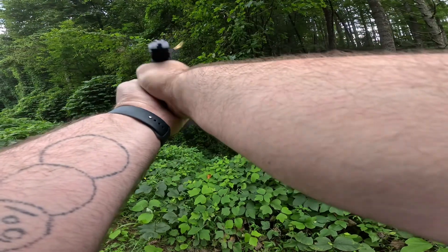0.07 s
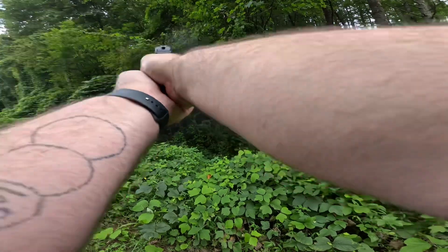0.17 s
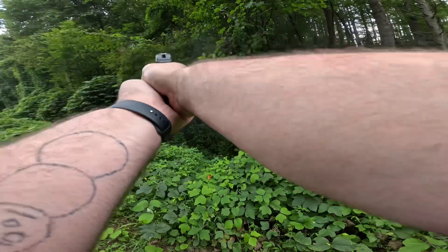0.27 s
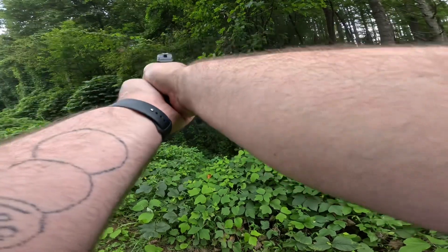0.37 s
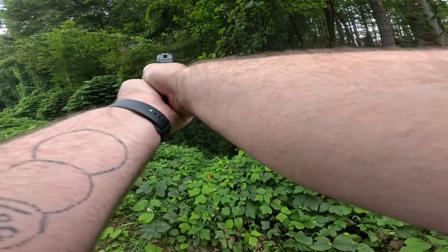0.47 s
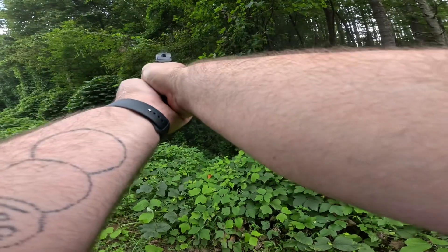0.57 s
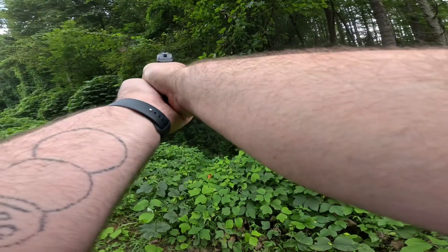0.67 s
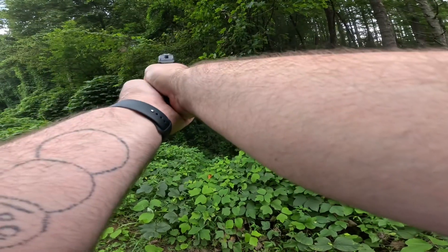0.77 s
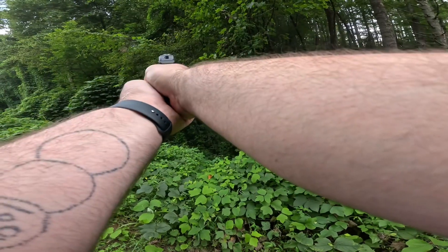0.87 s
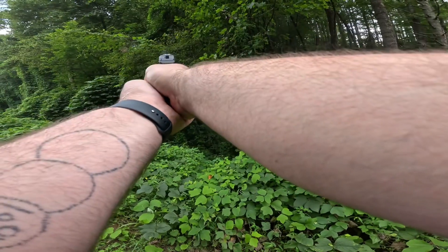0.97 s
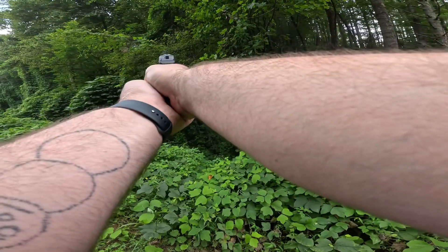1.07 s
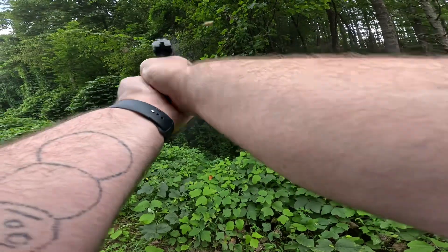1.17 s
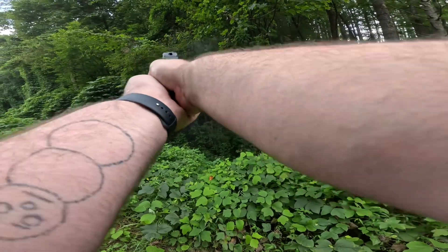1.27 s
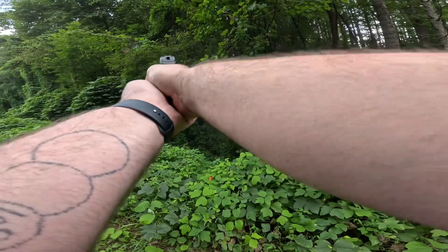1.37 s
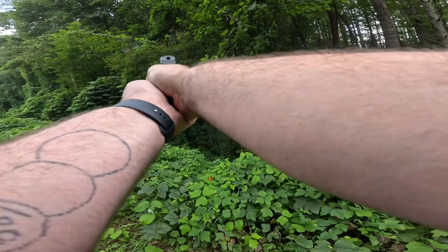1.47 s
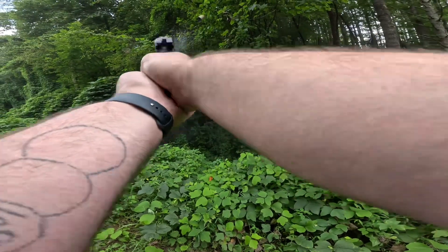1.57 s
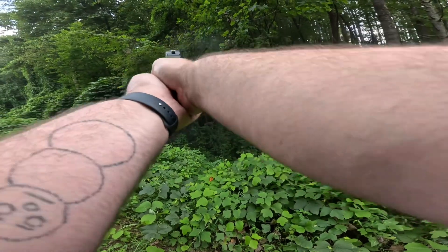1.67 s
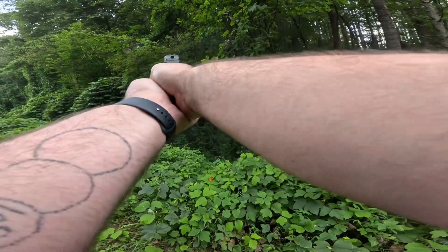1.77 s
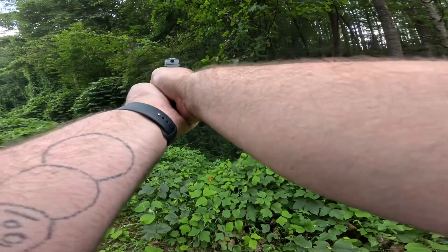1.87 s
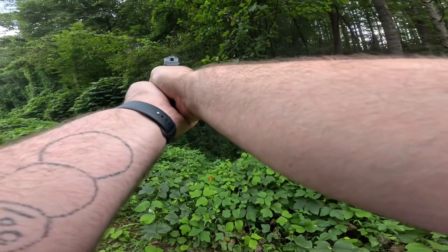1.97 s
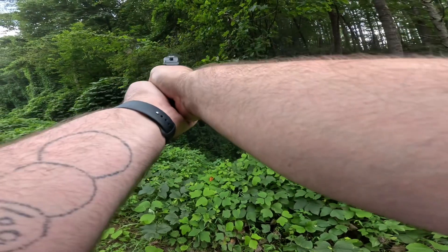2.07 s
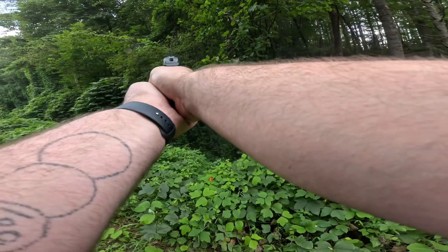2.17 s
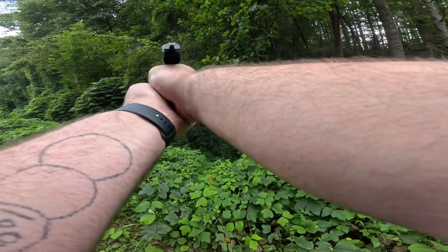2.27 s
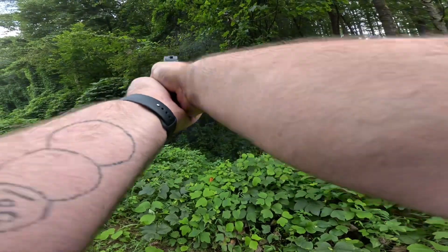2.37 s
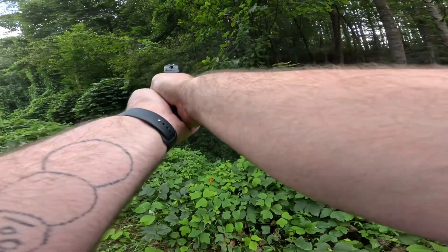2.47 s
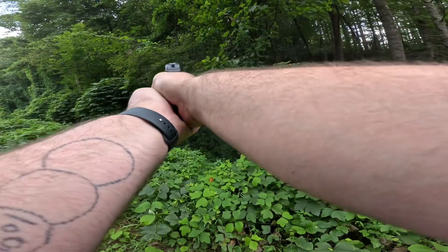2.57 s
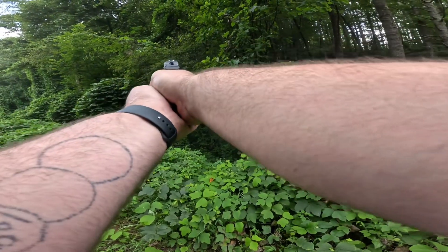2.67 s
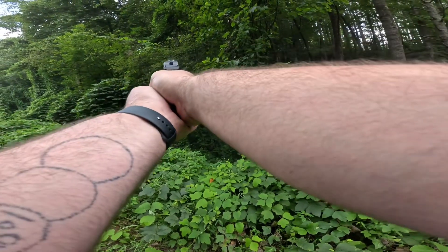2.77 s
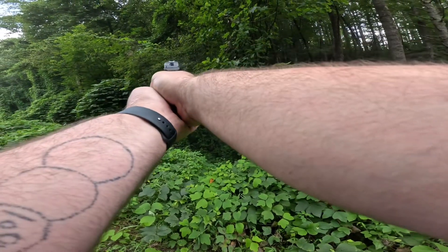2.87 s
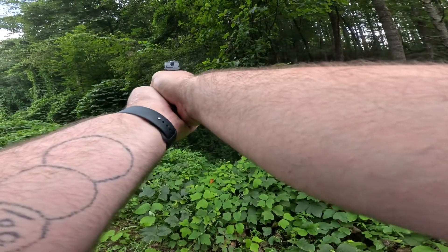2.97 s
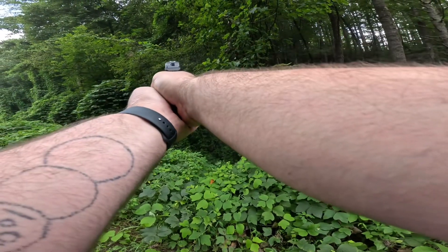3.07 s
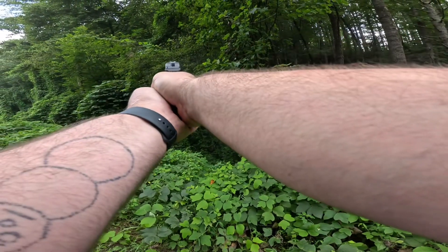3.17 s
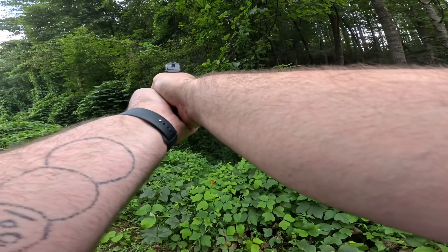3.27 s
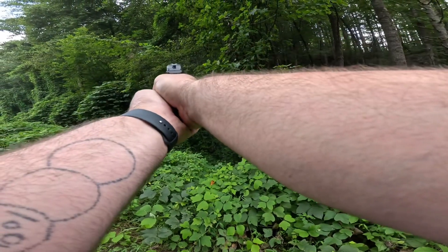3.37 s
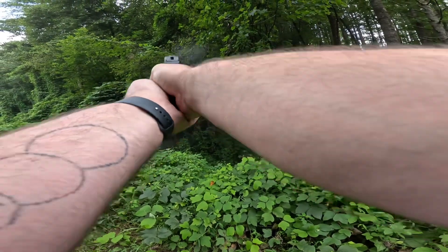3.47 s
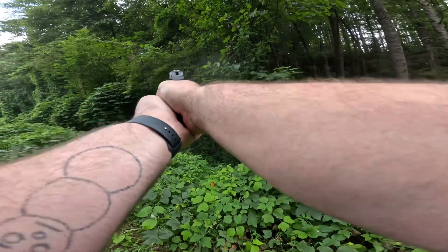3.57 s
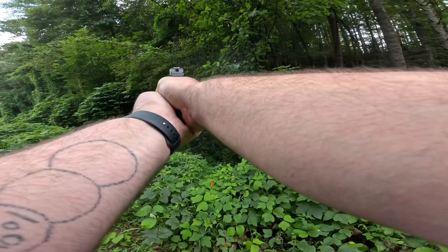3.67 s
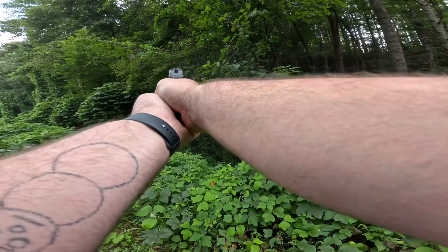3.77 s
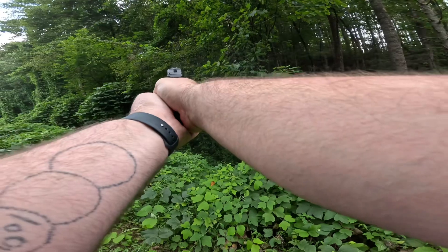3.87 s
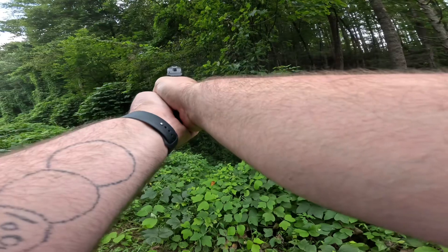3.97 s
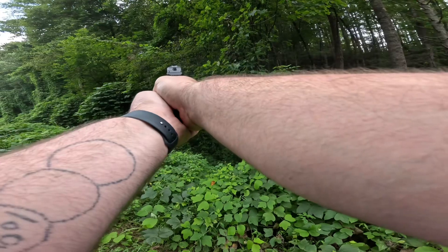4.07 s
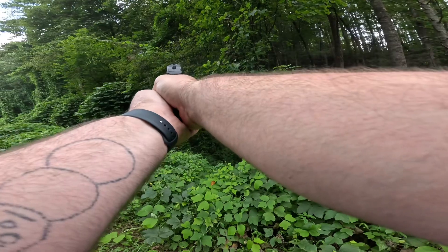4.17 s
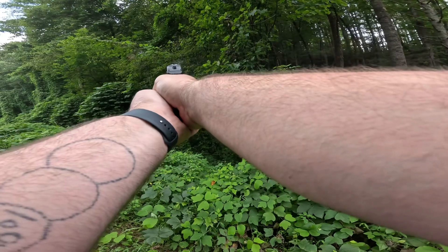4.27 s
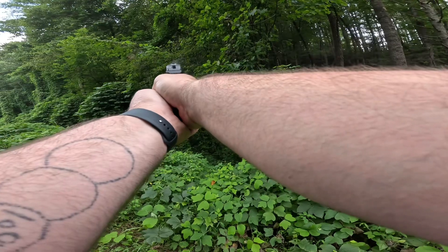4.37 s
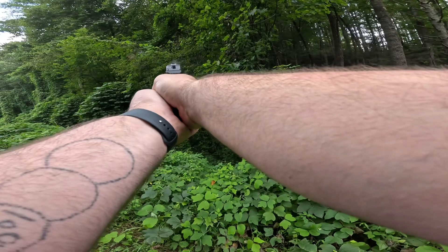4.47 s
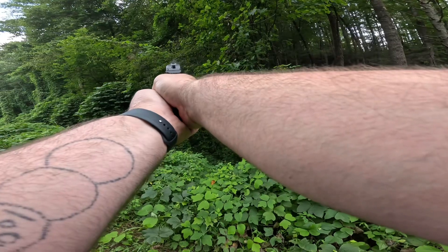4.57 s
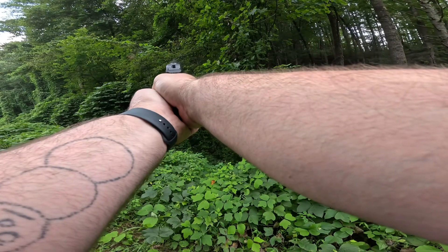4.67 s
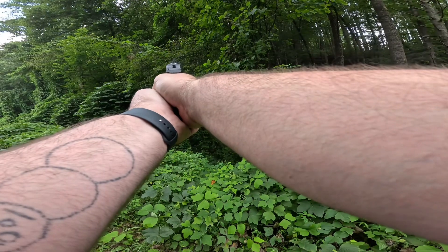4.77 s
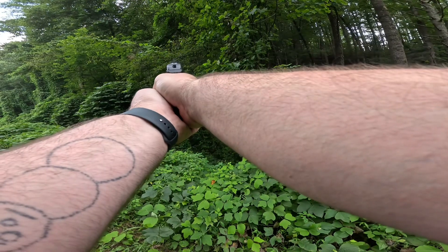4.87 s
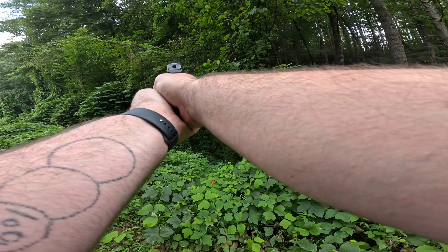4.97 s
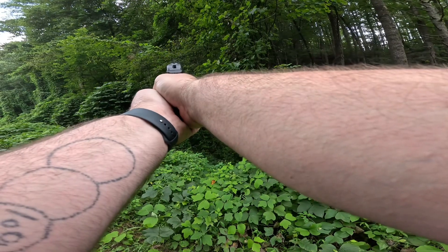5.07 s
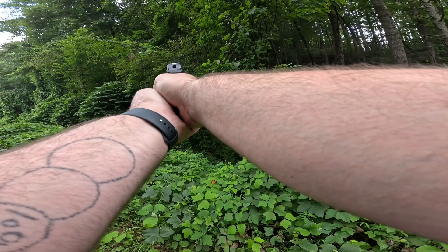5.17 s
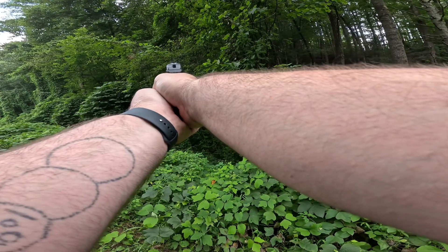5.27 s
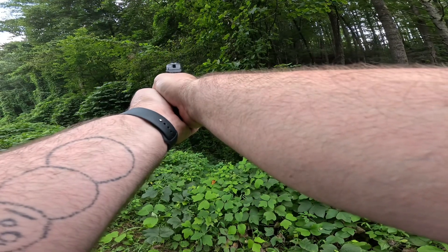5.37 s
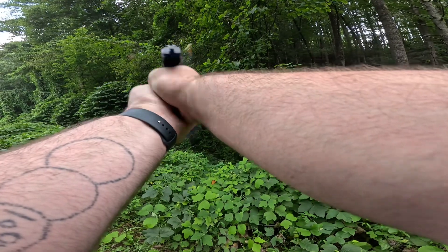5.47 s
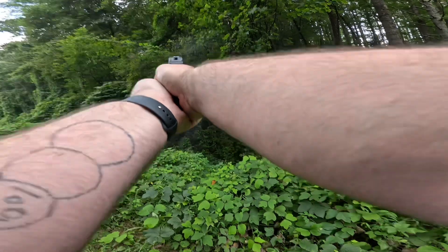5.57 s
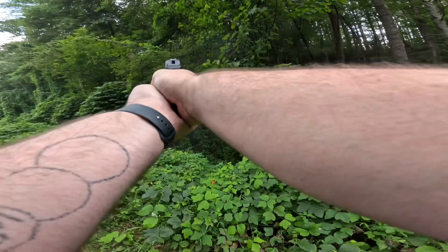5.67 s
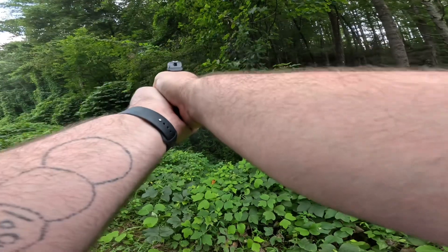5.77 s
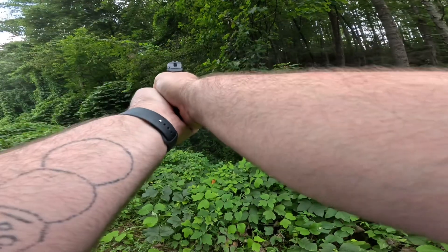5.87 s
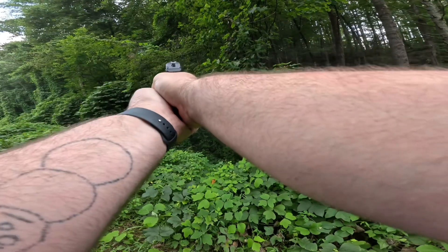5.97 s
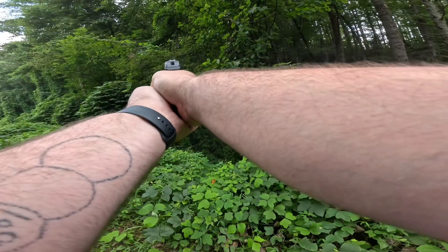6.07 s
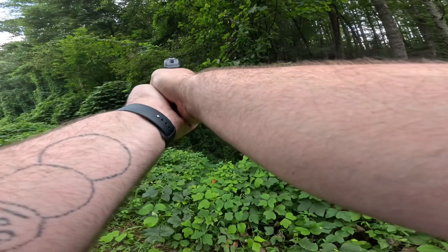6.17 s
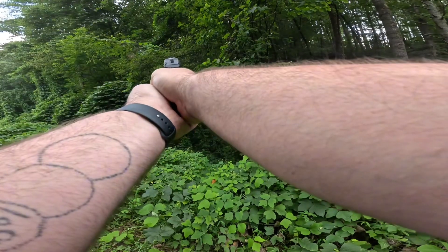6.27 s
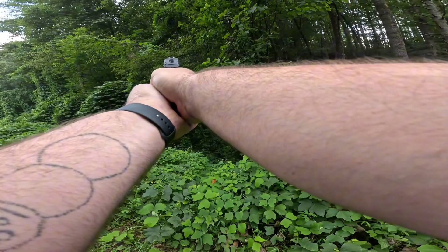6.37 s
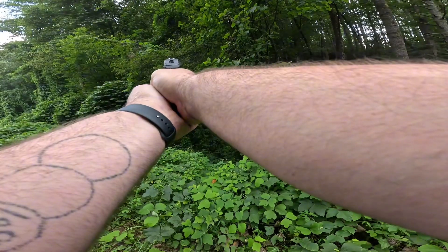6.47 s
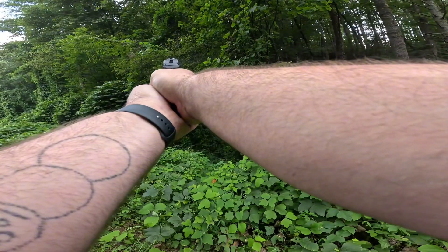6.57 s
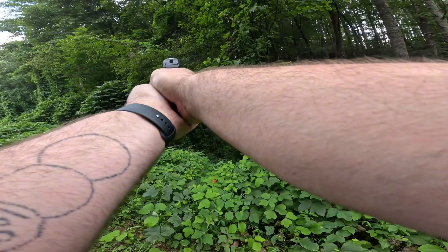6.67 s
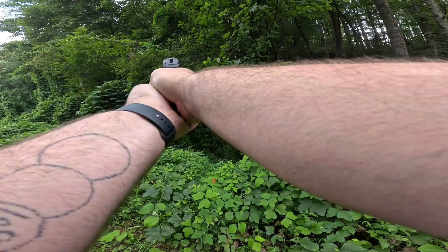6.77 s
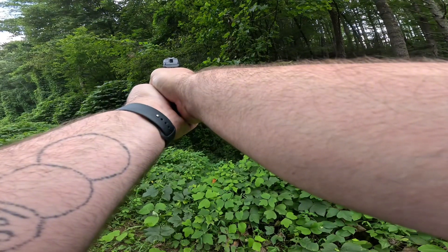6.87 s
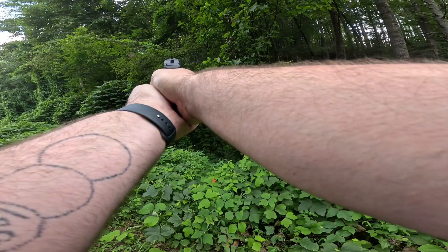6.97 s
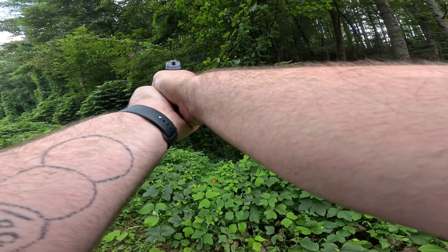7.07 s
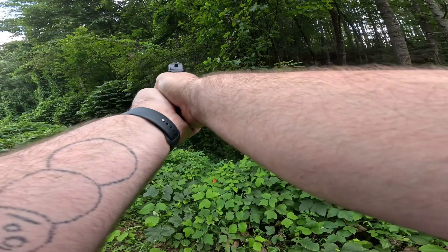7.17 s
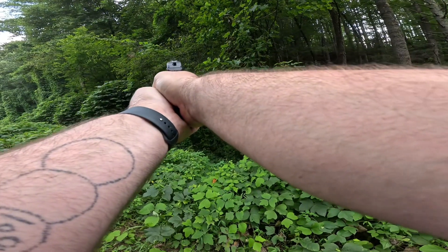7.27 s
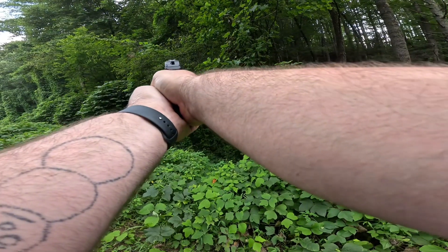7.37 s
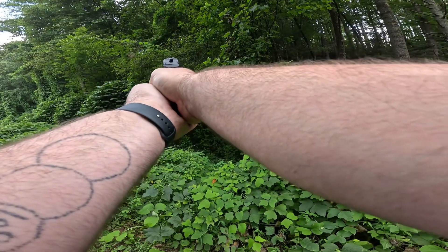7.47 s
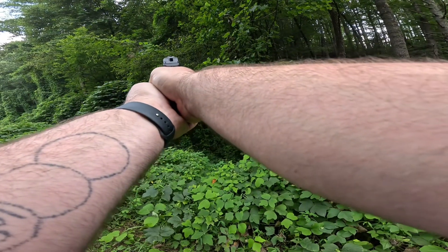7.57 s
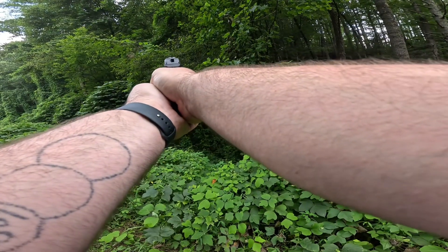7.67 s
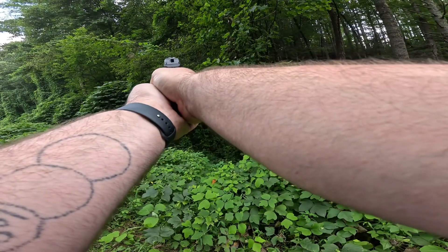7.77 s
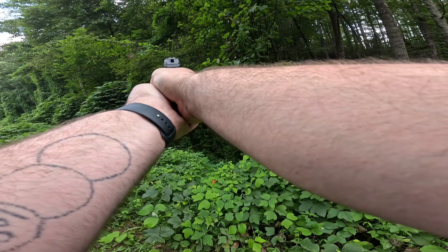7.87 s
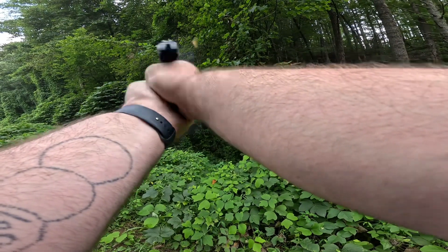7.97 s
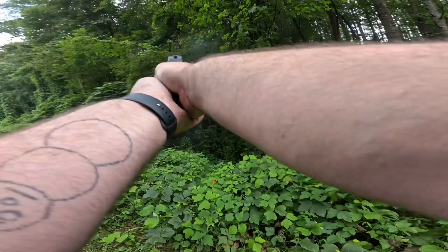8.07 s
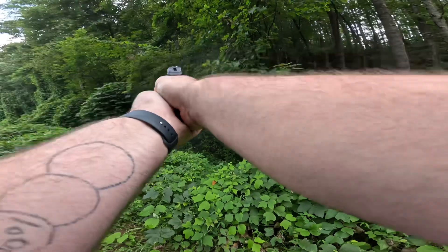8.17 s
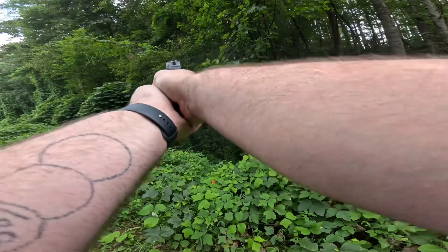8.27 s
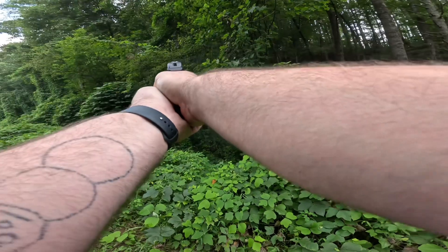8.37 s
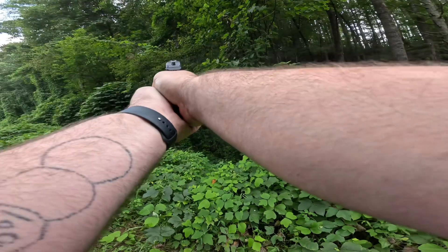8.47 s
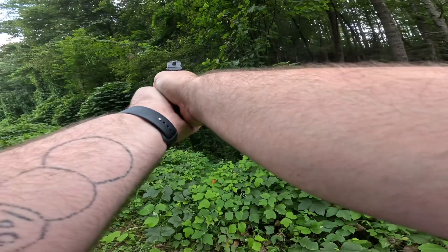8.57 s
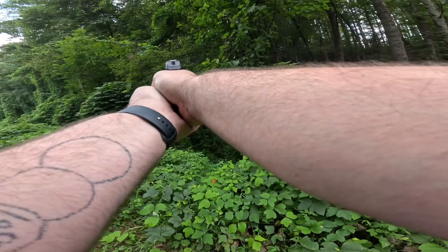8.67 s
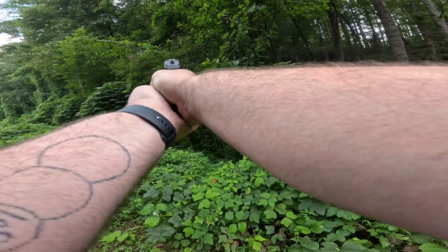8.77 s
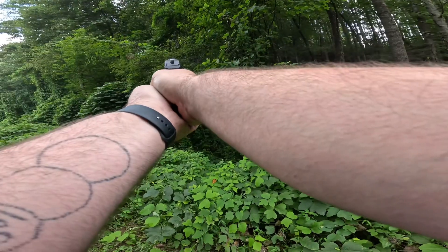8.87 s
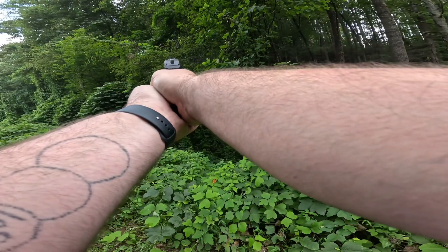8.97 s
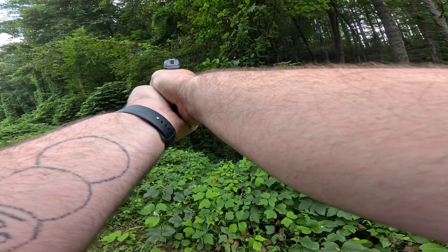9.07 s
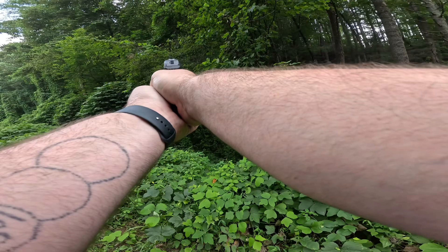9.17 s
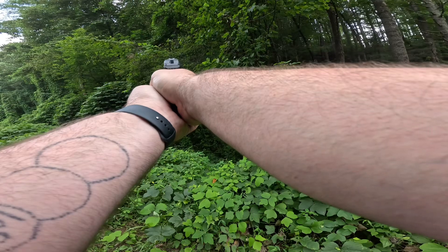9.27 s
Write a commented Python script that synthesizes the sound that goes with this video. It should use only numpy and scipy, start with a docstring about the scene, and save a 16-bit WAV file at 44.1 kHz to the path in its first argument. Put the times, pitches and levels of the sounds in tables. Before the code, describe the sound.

Seven close, punchy handgun shots with widening pauses, each trailed by a rolling forest echo over faint leaves and insects.

```python
"""At the edge of a wood, a pistol fires seven shots an arm's length from a chest-worn microphone.
A short hiss swells just before each shot; the shot is a crack and a low, overloaded punch.
The same trunks and slopes throw back every boom. Spent cases, hands and gun parts tick over a faint
bed of leaves, insects and rumble. The stereo image is wide on the first shot, then narrows to the
middle except in the top treble."""
import sys
import numpy as np
from scipy import signal
from scipy.fft import rfft, irfft, next_fast_len
from scipy.io import wavfile
from scipy.ndimage import map_coordinates

SR = 44100
rng = np.random.default_rng(int(sys.argv[2]) if len(sys.argv) > 2 else 0)


def pcm_store(signal):
    """Save signal as 16-bit PCM."""
    levels = np.round(np.clip(np.atleast_2d(signal), -1, 1) * 32767)
    wavfile.write(sys.argv[1], SR, levels.astype(np.int16).T)


N = 411453

# the shot cues: start_s, crack_db, echo_db, echo_tilt_db_per_octave, dip_db,
# lead_in_s, lead_in_db, lead_in_tilt_db_per_octave
SHOTS = [(0.0662, -3, 1, 2, 11, .04, -10.5, -4), (1.1506, -6.5, 1.5, 0.5, 1.5, .035, -9.5, -0.5),
         (1.5449, -10.5, 0.5, 0.5, 0, 0.036, -12.5, -1), (2.2790, -13, 1.5, 0.5, 1.5, 0.04, -11, -0.5),
         (3.3980, -12, 2.5, 0.5, 1.5, .035, -9, -1), (5.4692, -11, 3, 1, 2, 0.046, -9.5, 0.5),
         (7.9675, -1.5, 1.5, 0.5, 1.5, 0.045, -13.5, 1)]
# the punch, pressure pushes from the muzzle and off the ground: delay_s, level_db, pitch_hz, fade_s
PUSHES = [(.0016, 0, 415, .0038), (.0084, -2.5, 235, .0045), (.003, -21, 70, .012), (.009, -17, 125, .011)]
# EQ of the crack and of the lead-in hiss: frequency_hz, level_db
CRACK_EQ = [(800, -22.5), (2000, -0.5), (3600, 2), (6000, -11), (10000, -24), (15000, -28.5)]
LEAD_IN_EQ = [(18, -31), (30, -3.5), (1330, -2.5), (2420, -10), (3680, -3), (4090, -15), (4420, -10),
              (7460, -22), (10200, -23), (15500, -49)]
# the clearest slaps off trunks and thickets: delay_s, level_db, pitch_hz, half_length_cycles
TRUNK_SLAPS = [(.019, -16, 831, 1.1), (0.036, -23, 240, 1.5), (.052, -19.5, 523, 1.7),
               (.061, -15, 391, 1.1), (.107, -15.5, 332, 3), (.117, -14, 446, 1.3),
               (.164, -16.5, 505, 0.54), (0.173, -16.5, 520, 0.71), (.184, -20.5, 387, 2.8),
               (.202, -21, 610, 1.3), (.217, -20, 402, 1.7), (0.232, -22.5, 563, 8.7),
               (.245, -22.5, 363, 2.7), (.27, -20.5, 560, 1.5), (.297, -30.5, 600, 3.4),
               (.459, -30, 660, 0.9), (.654, -30.5, 535, 1.2), (.676, -29, 540, 1.2),
               (.72, -27.5, 678, 0.67), (.792, -28, 680, 0.82), (.864, -34.5, 589, 1)]
# envelope of the near wood's wash: delay_s, level_db
NEAR_ENVELOPE = [(0, -16), (.012, -13), (.025, -23), (.07, -27), (.22, -27), (.3, -30.5), (.4, -35),
                 (1, -53), (2.6, -97)]
# EQ of the near wood and of the far slopes: frequency_hz, level_db
NEAR_EQ = [(18, -53.5), (30, -26.5), (140, -11.5), (225, -3.5), (332, -6.5), (455, -9), (656, -6.5),
           (830, -13.5), (1360, -16.5), (1550, -22.5), (2760, -22.5), (8720, -33), (15500, -48.5)]
FAR_EQ = [(59, -88), (100, -57.5), (141, -17), (192, -17.5), (263, -7), (360, -4), (452, 0), (1300, -21),
          (3000, -47), (3900, -69), (6600, -120)]
# damping by air and leaves: frequency_hz, loss_db_per_s
DAMPING = [(50, 32), (130, 30), (230, 23.5), (380, 9.5), (700, -1.5), (3000, 8.5), (8000, 25.5),
           (15000, 59)]
# how much of the echo repeats from shot to shot: frequency_hz, likeness_ratio
ECHO_LIKENESS = [(300, 0.85), (1500, 0.87), (5000, 0.95)]
# ticks and rustles of cases, hands and gun parts: start_s, level_db, centre_hz, t60_s
TICKS = [(4.32, -76, 8000, .12), (6.407, -65, 9000, .015), (7.14, -82, 9000, 1.5),
         (7.3304, -63, 4500, .012), (7.345, -58, 1600, .03), (7.3663, -56, 3600, .016),
         (7.4, -76, 9500, .012), (7.415, -76, 9500, .012), (8.884, -60, 4000, .015)]
# a thin ring, as of a brass case: start_s, level_db, pitch_hz, width_hz, t60_s
BRASS_RINGS = [(4.598, -74, 10250, 45, .25)]
# fader moves of the background bed: time_s, leaves_db, rumble_db
BED_LEVELS = [(0, -51, -73), (.1, -70.5, -71), (4.2, -73, -78.5), (4.9, -65, -65.5), (6.3, -67, -75),
              (7.1, -69, -68), (7.3, -65.5, -60), (7.9, -64.5, -61), (8.8, -69, -72.5), (9.3, -73, -74.5)]
# EQ of the leaves and of the rumble: frequency_hz, level_db
LEAVES_EQ = [(88, -46.5), (150, -17.5), (436, 0.5), (930, -15), (2000, -15.5), (3000, -15.5), (6000, -25.5),
             (8600, -34), (12500, -38), (14500, -63.5)]
RUMBLE_EQ = [(8.8, -31.5), (15, 3), (50, -7.5), (109, -22), (150, -35.5), (200, -68), (330, -120)]
# fuzzy bands of far insects: centre_hz, width_hz, level_over_leaves_db
INSECTS = [(4550, 700, -23), (8500, 600, -30)]
# side-channel EQ below the top treble: frequency_hz, gain_db
SIDE_EQ = [(60, -15), (150, -28.5), (380, -21), (950, -8), (2380, -9.5), (5980, -8), (15000, -6.5)]
# side-channel fader below the top treble: time_s, gain_db
SIDE_FADER = [(0, 3.5), (.7, 0), (.9, -12), (1.05, -47.5), (9.3, -47)]


def pistol_shots():
    """Mid and side of blasts and echoes; the wood stands still, so its answer mostly repeats."""
    t = np.arange(round(2.6 * SR)) / SR
    wood = wood_wash(t) + trunk_slaps(t)
    likeness = lambda hz: np.clip(along(ECHO_LIKENESS, hz), 0, 1)
    out = np.zeros((2, N))
    for start_s, crack_db, echo_db, tilt_db, dip_db, lead_s, lead_db, lead_tilt_db in SHOTS:
        fresh = filtered(wood_wash(t), lambda hz: np.sqrt(1 - likeness(hz) ** 2))
        echo = amp(echo_db) * np.array([filtered(wood, likeness) + fresh, wood_wash(t)])
        late = np.clip(t / .31, 0, 1)  # crossfade to a brighter tail
        echo = (1 - late) * echo + late * tilted(echo, tilt_db)
        blast = np.zeros_like(echo)
        blast[:, :2000] = [muzzle_blast(t[:2000], crack_db) for _ in range(2)]
        # the level ducks within milliseconds of the blast and creeps back
        attack = 1 - np.exp(-(t / .004) ** 2)
        release = .88 * np.exp(-(t / .15) ** 2) + .1 * np.exp(-(t / .32) ** 2)
        add(out, start_s, amp(-dip_db * attack * release) * (echo + blast))
        add(out, start_s - lead_s, amp(lead_db) * lead_in(lead_s, lead_tilt_db))
    return out


def muzzle_blast(t, crack_db):
    """A millisecond of crack, then steep low pushes that overload the microphone."""
    out = amp(crack_db) * np.exp(-((t - .0005) / .0008) ** 4) * noise(CRACK_EQ, len(t))
    for delay_s, db, hz, fade_s in PUSHES:
        age = t - delay_s
        envelope = np.exp(-(age / np.where(age < 0, .0004, fade_s)) ** 2)
        out += amp(db) * envelope * np.cos(2 * np.pi * hz * age)
    return soft_clip(out, hardness=4)


def lead_in(length_s, tilt_db):
    """A hiss swells just before a shot and dies under it, with a new ragged EQ each time."""
    size = round(length_s * SR) + 300
    swell = np.sin(np.pi / 2 * np.arange(size) / size) ** 2.2
    swell *= np.clip(np.arange(size)[::-1] / 400, 0, 1)
    bands_hz, ragged_db = 200 * np.arange(80), 3.5 * rng.standard_normal(80)
    hiss = filtered(noise(LEAD_IN_EQ, (2, size)), lambda hz: amp(np.interp(hz, bands_hz, ragged_db)))
    return swell * tilted(unit(hiss), tilt_db, corner_hz=399.4)


def trunk_slaps(t):
    """Each trunk throws back a short, pitched swing of the boom."""
    pad = 2000  # samples either side of a slap's centre
    out, offset_s = np.zeros(len(t) + pad), np.arange(-pad, pad) / SR
    for delay_s, db, hz, cycles in TRUNK_SLAPS + weak_trunks(count=32):
        envelope = np.exp(-(offset_s * hz / max(cycles, 1)) ** 2)
        add(out, delay_s, amp(db) * envelope * np.cos(2 * np.pi * hz * offset_s))
    return out[pad:]


def weak_trunks(count):
    """Scattered rows like TRUNK_SLAPS: fewer, fainter and higher with distance."""
    distance, level, pitch, length = rng.standard_normal((count, 4)).T
    delay_s = .09 + .4 * np.abs(distance)
    db = -25.5 - 16 * delay_s + 3 * level
    hz = (430 + 220 * np.minimum(delay_s, 1)) * np.exp(.207 * pitch)
    cycles = 2.63 * np.exp(.5 * length)
    return list(zip(delay_s, db, hz, cycles))


def wood_wash(t):
    """Diffuse reverb: the near wood dulls as it decays, and a slow, dark roll returns from far slopes."""
    hz, delay_s, spectrum = signal.stft(noise(NEAR_EQ, len(t)), SR, nperseg=256)
    # the boom under 1 kHz starts held back and blooms in about 18 ms
    bloom_db = (.7 - 10 * np.exp(-(delay_s / .018) ** 2)) / (1 + (hz[:, None] / 1000) ** 4)
    loss_db = along(DAMPING, hz)[:, None] * delay_s
    near = signal.istft(spectrum * amp(bloom_db - loss_db), SR, nperseg=256)[1][:len(t)]
    far = amp(-31 - 13.42 * t) * np.clip(t / .6, 0, 1) ** 2 * noise(FAR_EQ, len(t))
    return amp(curves(NEAR_ENVELOPE, t)[0]) * near + far


def cases_and_handling():
    """Dry ticks, rustles and a thin brass ring, each a decaying band of noise."""
    out, t = np.zeros(N), np.arange(SR // 3) / SR
    for start_s, db, hz, t60 in TICKS:
        band = [(hz / 3, -14), (hz, 0), (hz * 1.6, -10), (hz * 3, -40)]
        add(out, start_s, amp(db - 60 * t / t60) * noise(band, len(t)))
    for start_s, db, hz, width_hz, t60 in BRASS_RINGS:
        band = [(hz - 4 * width_hz, -60), (hz, 0), (hz + 4 * width_hz, -60)]
        add(out, start_s, amp(db - 60 * t / t60) * noise(band, len(t)))
    return out


def background_bed():
    """Leaves, far insects and a low rumble, each swaying gently in level."""
    t = np.arange(N) / SR
    leaves_db, rumble_db = curves(BED_LEVELS, t)
    sways = [map_coordinates(points, [6 * t]) for points in rng.standard_normal((3, 60))]
    leaf_sway, rumble_sway, insect_sway = sways
    insects = np.zeros(N)
    for hz, width, db in INSECTS:
        band = [(hz - 2 * width, -90), (hz - width, -22), (hz, 0),
                (hz + width, -22), (hz + 2 * width, -90)]
        insects += amp(db) * noise(band, N)
    leaves = amp(leaf_sway) * noise(LEAVES_EQ, (2, N))
    rumble = amp(rumble_db + 1.8 * rumble_sway) * noise(RUMBLE_EQ, N)
    return amp(leaves_db) * (leaves + amp(3 * insect_sway) * insects) + rumble


def amp(db):
    return 10 ** (np.asarray(db) / 20)


def unit(x):
    return x / np.sqrt(np.mean(x ** 2) + 1e-20)


def along(points, hz):
    """Read (frequency_hz, value) points on a log axis."""
    points_hz, values = np.transpose(points)
    return np.interp(np.log(hz + 1), np.log(points_hz + 1), values)


def curves(rows, t):
    """Each column after the time, read at times t."""
    times_s, *columns = np.transpose(rows)
    return [np.interp(t, times_s, column) for column in columns]


def filtered(x, response):
    """EQ x with a gain given as a function of frequency."""
    size = next_fast_len(x.shape[-1] + 8192)
    return irfft(rfft(x, size) * response(np.fft.rfftfreq(size, 1 / SR)), size)[..., :x.shape[-1]]


def noise(eq, size):
    """Coloured noise of rms 1."""
    return unit(filtered(rng.standard_normal(size), lambda hz: amp(along(eq, hz))))


def tilted(x, db, corner_hz=1000):
    """Tilt x by db per octave above a corner."""
    return filtered(x, lambda hz: amp(db * np.log2(np.maximum(hz / corner_hz, 1))))


def high_cut(hz, stop_hz, width_hz):
    """A gain that falls smoothly from 1 to reach 0 at stop_hz."""
    return np.sin(np.pi / 2 * np.clip((stop_hz - hz) / width_hz, 0, 1)) ** 2


def soft_clip(x, hardness):
    """Round off peaks toward full scale."""
    return x / (1 + np.abs(x) ** hardness) ** (1 / hardness)


def add(track, start_s, sound):
    """Mix a sound in at start_s."""
    part = track[..., max(round(start_s * SR), 0):][..., :sound.shape[-1]]
    part += sound[..., :part.shape[-1]]


def scene():
    """Mix in mid and side, pull the image in after the first shot, and return left and right."""
    mid, side = pistol_shots() + background_bed()
    mid += cases_and_handling()
    below_top = lambda hz: high_cut(hz, stop_hz=11500, width_hz=1000)
    width = amp(curves(SIDE_FADER, np.arange(N) / SR)[0])
    body = width * filtered(side, lambda hz: amp(along(SIDE_EQ, hz)) * below_top(hz))
    # the two microphone ports stay unalike in the top treble
    side = body + amp(-5) * filtered(side, lambda hz: 1 - below_top(hz))
    return np.array([mid + side, mid - side])


def record(dry):
    """Soft-clip the loudest peaks, then cut the very top."""
    return filtered(soft_clip(dry, hardness=8), lambda hz: high_cut(hz, stop_hz=15750, width_hz=400))


dry = scene()
out = record(dry)
pcm_store(out)
```